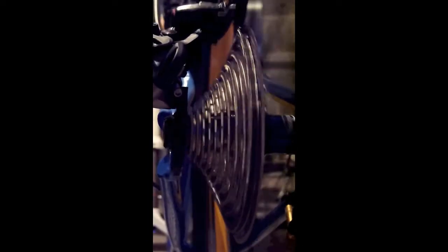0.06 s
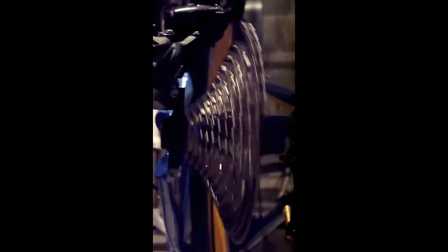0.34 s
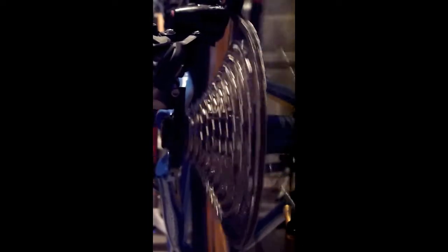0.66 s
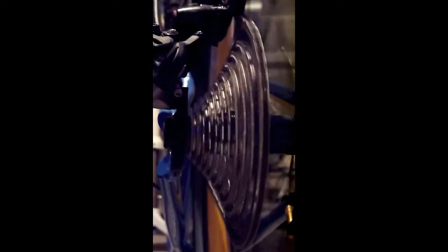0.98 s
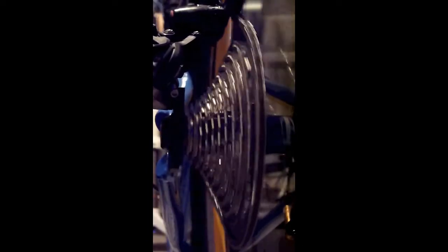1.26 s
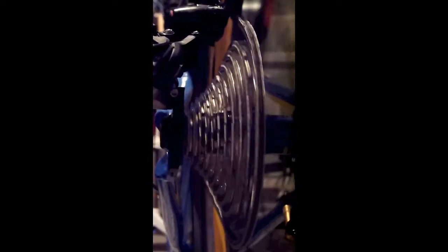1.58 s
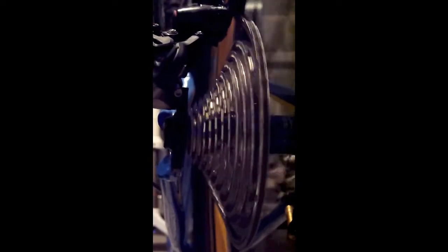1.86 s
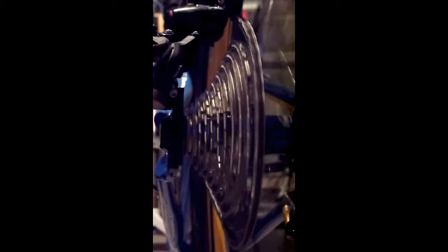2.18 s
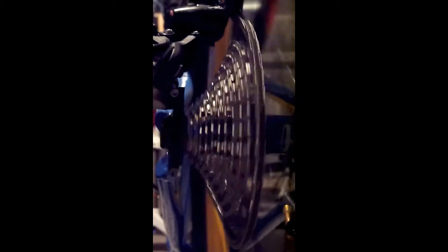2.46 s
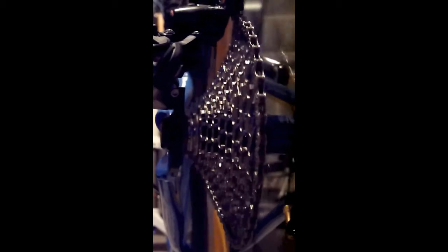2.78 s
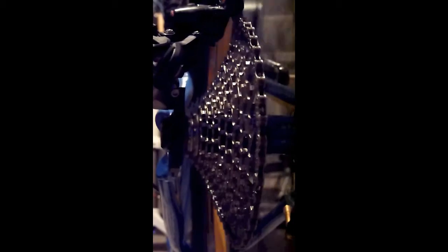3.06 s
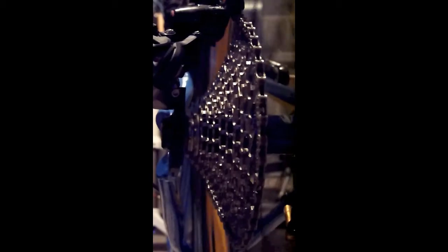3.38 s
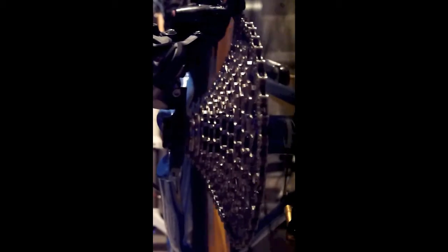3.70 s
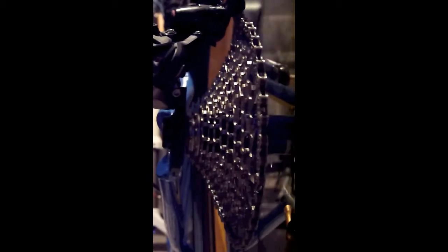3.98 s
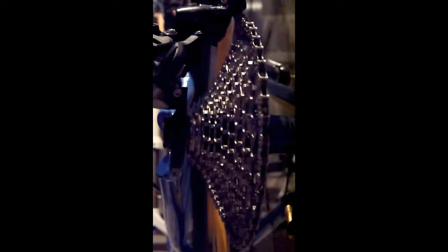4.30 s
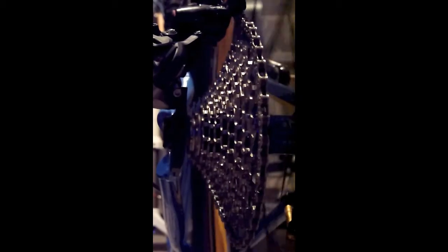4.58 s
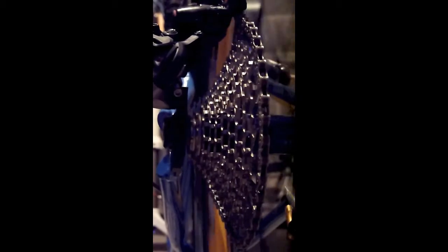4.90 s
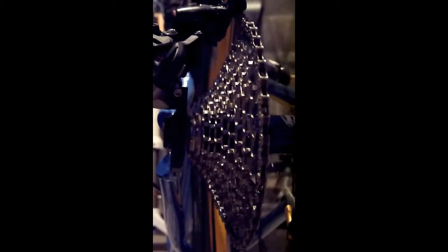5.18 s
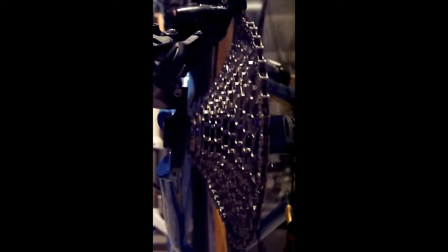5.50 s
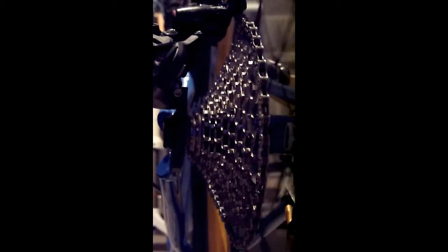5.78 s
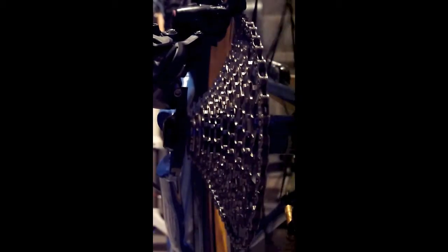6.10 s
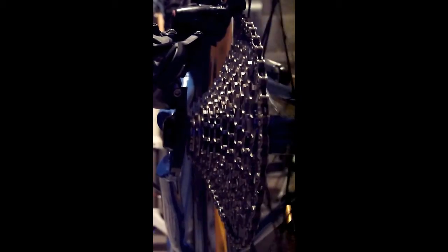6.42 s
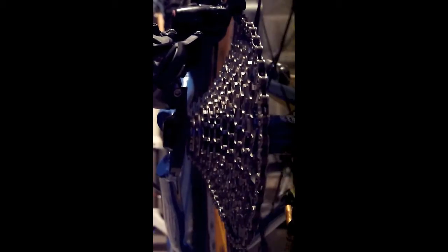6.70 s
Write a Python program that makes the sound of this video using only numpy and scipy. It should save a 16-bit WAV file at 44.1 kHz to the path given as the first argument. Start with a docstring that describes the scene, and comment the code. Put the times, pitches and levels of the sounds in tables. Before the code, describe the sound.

Close bicycle drivetrain running briefly, giving way to crisp metallic freewheel ticks that slow down, with tyre scuffing near the end.

```python
"""Bicycle freehub on a repair stand

A small workshop, stereo microphone close behind the cassette of a spinning rear wheel.
The drivetrain knocks and the chain settles on the sprockets; then the pedals stop and the freehub
pawls tick, once per ratchet tooth. Near the end something rubs on the wheel, a little to the right,
probably a hand on the tyre, and the ticks slow down."""
import sys
import numpy as np
from scipy import signal
from scipy.fft import rfft, irfft, next_fast_len
from scipy.io import wavfile

SR = 44100
rng = np.random.default_rng(int(sys.argv[2]) if len(sys.argv) > 2 else 0)


def materialize(psi):
    """Save the field psi as 16-bit PCM at rate SR to the path in sys.argv[1].

    A 1-D psi becomes a single channel; in a 2-D psi each row is a channel.
    """
    bounded = np.clip(np.atleast_2d(psi).T, -1, 1)
    quanta = np.round(bounded * 32767).astype(np.int16)
    wavfile.write(sys.argv[1], SR, quanta)


N = 302064
TIME = np.arange(N) / SR

# the main pawl snaps home, once per ratchet tooth: start_s, level_db
PAWL_TICKS = [(2.5294, -2.5), (2.6215, -1), (2.6933, -2.5), (2.7546, -1.5), (2.811, 0), (2.8659, -1.5),
              (2.9181, -2.5), (2.9714, -2), (3.0264, -1.5), (3.0812, -1), (3.1365, -1), (3.193, -1.5),
              (3.25, -1), (3.3067, -1), (3.3641, 0), (3.4222, 0), (3.4809, 0.5), (3.542, -2), (3.6011, -1),
              (3.6621, 1.0), (3.7245, -1), (3.788, 0), (3.8524, -0.5), (3.9181, -1), (3.9849, 1),
              (4.0536, -1), (4.1236, 0), (4.195, -1), (4.2683, 0), (4.343, 2.5), (4.4194, 2), (4.4975, 0.5),
              (4.5779, -2.5), (4.6576, 0), (4.7413, 0.5), (4.8259, -1), (4.9127, 0), (5.0005, -1),
              (5.0862, 0), (5.1801, 1.0), (5.274, 0.5), (5.3722, -1.0), (5.4726, -1.5), (5.5775, -0.5),
              (5.689, 1), (5.8065, 2.0), (5.9302, 1.0), (6.0613, 0.5), (6.2038, 1), (6.3611, -1),
              (6.538, 2), (6.7407, 0.5)]
# how far the other two pawls drop ahead of it: time_s, first_lead_s, middle_lead_s
PAWL_LEADS = [(2.53, .007, .003), (2.7, .004, .002), (3.05, .0024, .0005), (3.5, .0046, .002),
              (4.1, .0046, -.0005), (4.6, .0038, -.0005), (5.09, .0036, .0015), (5.18, .0075, .0039),
              (5.6, .008, .0038), (6.75, .0155, .005)]
# freehub spectra: frequency_hz, level_db
CLICK_SPECTRUM = [(700, -33.5), (2000, -14.5), (5000, -11), (7500, 0.5), (10500, 0), (14000, 3)]   # the main pawl's bare, bright click
STEEL_SPECTRUM = [(40, -91), (200, -76), (900, -35), (1300, -28), (2000, -10), (2800, -14), (3500, -7.5),
                  (5000, -10.5), (7000, 2.5), (8800, 7.5), (9350, 4.5), (9900, 5), (10550, 1.5), (11200, 2),
                  (12700, 8.5), (14100, 1), (14800, 4), (15700, -5.5)]   # steel on steel
TAIL_SPECTRUM = [(200, -50), (900, -14.5), (1300, -18), (1950, -7.5), (2800, -6.5), (3500, -7.5),
                 (5000, -7), (7000, -3.5), (9000, -2), (12000, 0), (15500, -4)]   # a tick dying away in the room
# ringing of hub and cassette: pitch_hz, level_db, t60_s
HUB_MODES = [(880, -9, .02), (1884, -9, .14), (2050, -15, .07), (3240, -11, .08), (5880, -9, .1),
             (7170, -2, .06), (8425, -1, .07), (8790, 1, .06), (8870, 1, .07), (9035, 1, .06),
             (9730, -3, .06), (9830, -1, .07), (10300, -3, .07), (10920, -3, .07), (12090, -3, .06),
             (12280, -4, .06), (12480, -3, .06), (12620, -3, .06), (13030, -3, .06), (14740, -4, .06)]
# reflections off surfaces near the hub: delay_s, level_db
CLOSE_ECHOES = [(.00365, -14), (.00445, -14), (.0054, -22)]

# pull on the chain: time_s, level_db
CHAIN_PULL = [(0, 1.5), (1.25, -0.1), (1.45, 1.6), (2.15, 1.5), (2.35, -1), (2.47, -4)]
# the chain catches on teeth: start_s, level_db, ping_share (0-1)
CHAIN_CATCHES = [(0.002, -21, 0), (0.058, -22, 0.67), (0.1054, -17.5, 1), (0.1122, -19, 1),
                 (0.139, -22, 0.8), (0.346, -46, 0.5), (0.498, -25.5, 0.44), (0.768, -29.5, 0.62),
                 (0.812, -32.5, 0.5), (0.986, -34, 0.3), (1.407, -34.5, 0.3)]
# knocks through the frame: start_s, ring_db, thud_db
FRAME_KNOCKS = [(0.002, -34, -46), (0.059, -21, -18.5), (0.137, -30, -22.5), (0.165, -32.5, -22.5),
                (0.188, -19.5, -21.5), (0.24, -37, -36), (0.56, -41, -60), (6.157, -38, -34.5),
                (6.593, -39, -28.5)]
# ringing of the frame: pitch_hz, level_db, t60_s
FRAME_MODES = [(222, 1, .2), (318, 0, .16), (522, -5, .6), (608, -4.5, .6), (743, -9, .4), (840, -2, .16),
               (1150, -7, .08), (1500, -9, .08), (1900, -10, .08)]
# drivetrain spectra: frequency_hz, level_db
LINK_SPECTRUM = [(150, -48.5), (300, -6), (560, -10.5), (860, -7.5), (1200, -11), (1600, -9.5),
                 (2200, -16.5), (3000, -18), (3800, -11.5), (5700, -13.5), (8000, -15), (13300, -12.5),
                 (15500, -24)]   # rattling links
PURR_SPECTRUM = [(40, -18.5), (160, -18), (210, -2), (255, 0.5), (300, -11.5), (500, -21), (1000, -42)]   # the frame, tapped by the links
PING_SPECTRUM = [(1000, -37), (10000, -31), (12500, 1), (13600, 8), (15500, -9)]   # a tooth's thin, high ring
THUD_SPECTRUM = [(20, -59), (110, 3.5), (200, 8.5), (800, 6.5), (1300, -2), (2000, -6), (3500, -25),
                 (10000, -52)]   # the clunk of a knock

# two long grips on the tyre, a curve for each: time_s, rumble_db, scuff_db
TYRE_GRIPS = [
    [(5.5, -59, -64), (5.68, -46, -40.5), (5.78, -48, -35.5), (5.89, -42.5, -35.5), (5.94, -35.5, -34),
     (6.07, -38, -31.5), (6.11, -39.5, -29.5), (6.14, -40, -24.5), (6.165, -37.5, -22), (6.185, -40.5, -30),
     (6.23, -43, -46), (6.33, -62, -62)],
    [(6.38, -44, -45), (6.41, -50, -44), (6.43, -37.5, -31.5), (6.5, -42.5, -26), (6.56, -43, -39),
     (6.66, -45, -46), (6.72, -54.5, -53), (6.85, -43.5, -66)],
]
# short brushes against the tyre: peak_s, rumble_db, scuff_db
TYRE_BRUSHES = [(5.172, -41, -38), (5.37, -41, -41), (6.597, -38.5, -24.5), (6.765, -43.5, -33.5)]
# the rubbing briefly takes on a pitch: middle_s, length_s, pitch_hz, level_db
TYRE_CHIRPS = [(5.141, .22, 420, -48.5), (5.744, 0.3, 361, -42.5), (5.898, 0.39, 549, -42),
               (6.04, .09, 284.5, -34.5), (6.596, 0.0304, 793, -25.5), (6.766, .045, 1402, -35.5),
               (6.821, 0.074, 585, -41), (6.833, 0.065, 893, -37.5)]
# ringing of rim and spokes: pitch_hz, level_db, t60_s
RIM_MODES = [(799, -10.5, 0.12), (1132, -2, 0.19), (1245, 1, 0.072), (1462, 4.5, 0.085), (1792, -1, .08),
             (1960, -1, .08), (3220, 14, .015)]
# tyre spectra: frequency_hz, level_db
RUMBLE_SPECTRUM = [(25, -22), (55, -14), (100, -7), (140, -21.5), (300, -10.5), (520, -8.5), (800, -8.5),
                   (2000, -22.5)]   # hollow body of the rubbing
GROWL_SPECTRUM = [(60, -19), (110, -13), (150, 2), (210, 1.5), (290, -3.5), (400, -11), (1000, -34)]   # its low end under a hard grip
SCUFF_SPECTRUM = [(200, -27), (550, -21), (780, -13), (950, -3.5), (1130, 0.5), (1450, 0.5), (1750, -3),
                  (2800, -11.5), (3300, -2.5), (4200, -2.5), (6000, -4), (9000, -6), (12500, -4.5),
                  (14500, -12), (15500, -25)]   # dry drag of the tread
BITE_SPECTRUM = [(1200, -27), (2000, 5), (2800, 1), (3250, 6.5), (3700, -7), (5900, -9), (13000, -26)]   # its edge when pressed hard

# still workshop air: frequency_hz, level_db
AIR_SPECTRUM = [(25, -33), (40, 2.5), (62, 9.5), (95, 3.5), (125, -2), (200, 3.5), (330, 7.5), (520, 1),
                (850, 3), (1300, -0.5), (1900, 3), (3200, -9), (7000, -8.5), (15000, -4)]
# likeness of the left and right channels: frequency_hz, correlation
ROOM_CORRELATION = [(100, 1), (1000, 1), (2000, 0.78), (3200, 0.095), (4800, 0.42), (9000, 0.087),
                    (11500, -0.48), (15000, -0.55)]   # sound from all round
HUB_CORRELATION = [(900, 1), (1900, 0.71), (3200, 0.45), (7500, 0.63), (9500, 0.31), (10800, 0.51),
                   (13000, 0.59)]   # the nearby hub
# dips of the microphone: frequency_hz, width_hz, depth (0-1)
MIC_NOTCHES = [(2591, 605, 0.82), (4588, 910, 1), (7940, 460, 1)]


def freehub():
    """Right at the microphone, each pawl contact cracks, rings the cassette and echoes in the room."""
    snaps, rattle_energy = pawls()
    click = from_db(2.6) * snaps
    chatter_energy = (from_db(-2) * snaps) ** 2   # the main pawl beds in
    energy = chatter_energy + rattle_energy + click ** 2
    contact_noise, sprocket_noise = np.sign(rng.standard_normal((2, 2, N))) / np.sqrt(2)
    crack_shape = np.hypot(fading(chatter_energy, t60_s=.0025), fading(rattle_energy, t60_s=.007))
    crack = diffuse(crack_shape * contact_noise, HUB_CORRELATION)
    sprockets = from_db(-3.5) * diffuse(fading(energy, t60_s=.036) * sprocket_noise, HUB_CORRELATION)
    hub_ring = from_db(-7.5) * convolve(crack + click, ringing(HUB_MODES))
    direct = colour(click, CLICK_SPECTRUM) + colour(crack + sprockets, STEEL_SPECTRUM) + hub_ring
    direct = highpass(direct, hz=650)   # small steel parts radiate no bass
    echoes = sum(from_db(db) * delayed(direct, delay_s) for delay_s, db in CLOSE_ECHOES)
    tail = from_db(-6) * colour(diffuse_noise(fading(energy, t60_s=.2)), TAIL_SPECTRUM)
    return vary_tick_colour((direct + echoes) * from_db([[-1.5], [1.4]]) + tail)


def pawls(first_db=-3, middle_db=-.5, bounce_db=-11):
    """Three pawls drop and bounce: impulses of the main one, and the energy of the lighter contacts."""
    start_s, snap_db = np.transpose(PAWL_TICKS)
    lead_times, *leads = np.transpose(PAWL_LEADS)
    first_lead, middle_lead = [np.interp(start_s, lead_times, lead) for lead in leads]
    chance = rng.random((len(start_s), 2))
    spread_db = rng.normal(0, 1, (len(start_s), 4))
    contacts = [(start_s - first_lead, first_db + spread_db[:, 0]),
                (start_s - middle_lead, middle_db + spread_db[:, 1]),
                (start_s + .0024 * chance[:, 0], bounce_db + spread_db[:, 2]),
                (start_s + .0011 + .0068 * chance[:, 1], bounce_db + spread_db[:, 3])]
    contact_s, contact_db = np.concatenate(contacts, axis=1)
    return impulses(start_s, from_db(snap_db)), impulses(contact_s, from_db(contact_db) ** 2)


def vary_tick_colour(ticks, echo_gain=.22):
    """A faint, very short echo at a random delay gives each tick a slightly different colour."""
    start_s = np.transpose(PAWL_TICKS)[0]
    tick_index = np.searchsorted(start_s - .02, TIME).clip(1) - 1
    lag_s = rng.uniform(.0004, .003, len(start_s))[tick_index]
    echo = ticks[:, np.maximum(np.arange(N) - (lag_s * SR).astype(int), 0)]
    return (ticks + echo_gain * echo) / np.hypot(1, echo_gain)


def chain(links_per_s=39.4, slowing_per_s2=.72, stop_s=2.55, run_down_s=.062, settle_s=.19):
    """Each link rattles as it seats on the sprocket, then taps the frame; all stops with the pedals."""
    links_passed = links_per_s * TIME - .5 * slowing_per_s2 * TIME ** 2
    seat_s = TIME[1:][np.diff(np.floor(links_passed)) > 0]
    seating = from_db(1.4 * np.cos(2 * np.pi * links_passed) + 2.4 * drift(500) + 1.1 * drift(14))
    rattle = from_db(-44.5) * wash(LINK_SPECTRUM, seating) + rollers(seat_s)
    jitter, force = rng.standard_normal((2, len(seat_s)))
    outer_link_db = 5 * (np.arange(len(seat_s)) % 2)   # every other link taps harder
    taps = impulses(seat_s + .01194 + .003 * jitter, from_db(outer_link_db + 2.6 * force))
    purr = .85 * unit_rms(colour(taps, PURR_SPECTRUM)) + .62 * wash(PURR_SPECTRUM)
    unsettled_db = 7 * np.exp(-(TIME / settle_s) ** 2)   # louder until it finds its sprocket
    running = np.clip((stop_s - TIME) / run_down_s, 0, 1)
    pull = running * from_db(curves(CHAIN_PULL)[0] + unsettled_db)
    return pull * (rattle * from_db([[-.5], [.5]]) + from_db(-48.5) * purr)


def rollers(seat_s):
    """Each roller lands with a tiny bright tick; now and then a stiff link flicks straight, louder."""
    level_db = -31 - 4.5 * np.log(rng.random(len(seat_s)) + .18)
    energy = impulses(seat_s, from_db(level_db)) ** 2
    ticks = fading(energy, t60_s=.0074) * close_noise(side_share=.22)
    return colour(ticks, [(1000, -16), (3500, 6), (6000, 10), (9000, 0), (13500, 0), (15500, 3)])


def chain_catches():
    """Side plates snag on the teeth and snap free with a broad clack and a thin ping."""
    start_s, level_db, ping_share = np.transpose(CHAIN_CATCHES)
    clack_energy = impulses(start_s, from_db(level_db + 17) * (1 - ping_share)) ** 2
    ping_energy = impulses(start_s, from_db(level_db + 16) * ping_share) ** 2
    shape = np.hypot(fading(clack_energy, t60_s=.068), from_db(4) * fading(clack_energy, t60_s=.15))
    clack = colour(diffuse_noise(shape),
                   [(300, -2.5), (1500, -6), (3000, -7.5), (6000, -1.5), (15000, -4.5)])
    ping = colour(fading(ping_energy, t60_s=.018) * close_noise(side_share=.34), PING_SPECTRUM)
    return clack + ping


def frame_knocks():
    """Jolts of the drivetrain and wheel: a dry clunk, a short tail in the room and the ringing frame."""
    start_s, ring_db, thud_db = np.transpose(FRAME_KNOCKS)
    energy = impulses(start_s, from_db(thud_db)) ** 2
    clunk = from_db(14.5) * fading(energy, t60_s=.033)
    tail = from_db(17.5) * fading(energy, t60_s=.43)
    thud = colour(diffuse_noise(np.hypot(clunk, tail)), THUD_SPECTRUM)
    ring = convolve(impulses(start_s, from_db(ring_db + 20)), ringing(FRAME_MODES))
    return thud + ring


def tyre_rubbing():
    """The tread drags in tiny uneven slips: a growling rumble, and a scuff that rings the rim."""
    rumble_level, scuff_level = tyre_contact()
    slips = from_db(2 * drift(400) + 1.3 * drift(45))
    grit = slips * from_db(drift(1600))
    pressed = pressure(scuff_level, onset_db=-38, range_db=10)
    gripped = pressure(rumble_level, onset_db=-46, range_db=8)
    scuff = from_db(1) * wash(SCUFF_SPECTRUM, grit)
    bite = from_db(-4.5) * pressed * wash(BITE_SPECTRUM, grit)
    rim = from_db(-8.5) * convolve(diffuse_noise(scuff_level * grit) / np.sqrt(2), ringing(RIM_MODES))
    breakup = from_db(-4.5 * drift(82))
    growl = from_db(-4) * gripped * wash(GROWL_SPECTRUM, breakup)
    rumble = rumble_level * (wash(RUMBLE_SPECTRUM, slips) + growl)
    scrape = scuff_level * (scuff + bite) + rim
    return rumble + scrape * from_db([[-2.4], [1.6]])   # right of the microphone


def tyre_contact():
    """Amplitudes of rumble and scuff: the grips follow their curves, each brush swells and lets go."""
    levels = sum(from_db(curves(grip)) * (TIME >= grip[0][0]) * (TIME <= grip[-1][0])
                 for grip in TYRE_GRIPS)
    for peak_s, rumble_db, scuff_db in TYRE_BRUSHES:
        shape = np.exp(-np.maximum((peak_s - TIME) / .027, (TIME - peak_s) / .025))
        levels = np.hypot(levels, from_db([[rumble_db], [scuff_db]]) * shape)
    return levels


def pressure(level, onset_db, range_db):
    """How hard the tyre is pressed, 0-1, rising with the level of the rubbing."""
    return np.clip((20 * np.log10(level + 1e-9) - onset_db) / range_db, 0, 1)


def tyre_chirps(sag_octaves_per_s=.275):
    """Slips fall into step for a moment and give a rough, wavering tone."""
    out = np.zeros(N)
    for middle_s, length_s, pitch_hz, level_db in TYRE_CHIRPS:
        span = np.abs(TIME - middle_s) < length_s / 2
        t = TIME[span] - middle_s
        waver_hz = 42 * np.sqrt(pitch_hz / 300) * drift(220)[span]
        hz = pitch_hz * 2 ** (-sag_octaves_per_s * t) + waver_hz
        envelope = from_db(level_db + 4.6 * drift(120)[span]) * np.cos(np.pi * t / length_s)
        out[span] += envelope * np.sin(2 * np.pi * np.cumsum(hz) / SR)
    return out


def bearings():
    """The hub drones faintly on its bearings, most while the wheel coasts."""
    coasting = np.interp(TIME, [2.4, 3.2, 5, 6], [.23, 1, .92, 0])
    drone = wash([(100, -49), (185, -13), (215, 4.5), (250, -11), (400, -29), (1000, -39)])
    return from_db(-62.5) * coasting * drone


def room_tone(hum_hz=147.7):
    """Still workshop air all round the microphone, with a faint steady hum."""
    return from_db(-49) * wash(AIR_SPECTRUM) + from_db(-68.5) * np.sin(2 * np.pi * hum_hz * TIME)


def from_db(db):
    return 10 ** (np.asarray(db) / 20)


def unit_rms(x):
    return x / np.sqrt(np.mean(x ** 2) + 1e-20)


def unit_energy(x):
    return unit_rms(x) / np.sqrt(x.shape[-1])


def curves(rows):
    """One curve over time for each column after the first."""
    time_s, *columns = np.transpose(rows)
    return [np.interp(TIME, time_s, column) for column in columns]


def at_hz(points, hz):
    """Interpolate along a logarithmic frequency axis."""
    frequency_hz, values = np.transpose(points)
    return np.interp(np.log(np.maximum(hz, 1)), np.log(frequency_hz), values)


def convolve(x, response):
    return signal.fftconvolve(np.atleast_2d(x), np.atleast_2d(response), axes=-1)[:, :x.shape[-1]]


def highpass(x, hz):
    return signal.sosfilt(signal.butter(2, hz, "high", fs=SR, output="sos"), x)


def delayed(x, delay_s):
    return np.pad(x, ((0, 0), (int(delay_s * SR), 0)))[:, :N]


def colour(x, spectrum, size=4096):
    """Minimum-phase filter with the given spectrum and unit energy."""
    cepstrum = irfft(np.log(from_db(at_hz(spectrum, np.fft.rfftfreq(size, 1 / SR)))))
    cepstrum[1:size // 2] *= 2
    cepstrum[size // 2 + 1:] = 0
    return convolve(x, unit_energy(irfft(np.exp(rfft(cepstrum)))))


def diffuse(pair, correlation):
    """Two unrelated signals become a stereo spread, alike on both channels in the bass."""
    padded = next_fast_len(N)
    mid, side = rfft(pair, padded)
    alike = np.clip(at_hz(correlation, np.fft.rfftfreq(padded, 1 / SR)), -.9, .996)
    return irfft(np.sqrt(1 + alike) * mid + np.sqrt(1 - alike) * side * [[1], [-1]], padded)[:, :N]


def diffuse_noise(envelope):
    """White noise from all round the room."""
    return diffuse(envelope * rng.standard_normal((2, N)), ROOM_CORRELATION)


def close_noise(side_share):
    """Noise from a close source, largely the same on both channels."""
    mid, side = rng.standard_normal((2, N))
    return np.sqrt(1 - side_share) * mid + np.sqrt(side_share) * side * [[1], [-1]]


def wash(spectrum, envelope=1):
    """Diffuse coloured noise of rms 1."""
    return unit_rms(colour(diffuse_noise(envelope), spectrum))


def drift(rate_hz):
    """A line wandering through 4096 random values, rate_hz of them a second, then holding."""
    knots = rng.standard_normal(4096)
    return np.interp(TIME * rate_hz, np.arange(len(knots)), knots)


def impulses(times_s, gains):
    out = np.zeros(N)
    np.add.at(out, np.clip(np.round(times_s * SR).astype(int), 0, N - 1), gains)
    return out


def ringing(modes):
    """A body's modes, struck together."""
    t = TIME[:SR // 2]
    partials = (from_db(db - 60 * t / t60_s) * np.sin(2 * np.pi * hz * t) for hz, db, t60_s in modes)
    return unit_energy(sum(partials))


def fading(energy, t60_s, size=13230):
    """Amplitude envelope of contacts whose energy dies away with one decay time."""
    decay = from_db(-120 * TIME[:size] / t60_s)
    return np.sqrt(np.maximum(convolve(energy, decay / decay.sum()), 0))


def scene():
    """The bicycle and the workshop, from close behind the cassette."""
    drivetrain = freehub() + chain() + chain_catches() + frame_knocks()
    return drivetrain + tyre_rubbing() + tyre_chirps() + bearings() + room_tone()


def record(dry):
    """The microphone thins the deep bass and has narrow dips; peaks are capped and the top is cut."""
    out = highpass(dry, hz=35)
    for hz, width_hz, depth in MIC_NOTCHES:
        notched = signal.lfilter(*signal.iirnotch(hz, hz / width_hz, fs=SR), out)
        out = out + depth * (notched - out)
    top_cut = signal.ellip(10, .2, 80, 15600, fs=SR, output="sos")
    return signal.sosfilt(top_cut, np.clip(out, -.75, .75))


dry = scene()
out = record(dry)
materialize(out)
```